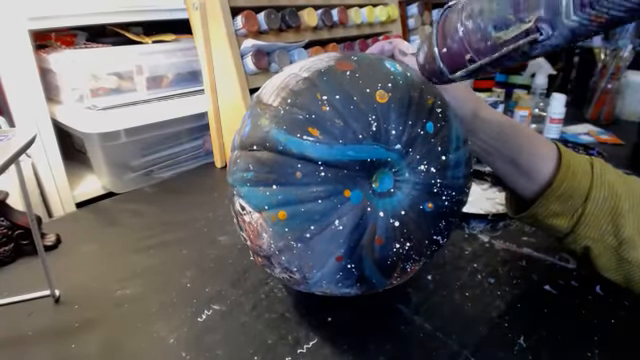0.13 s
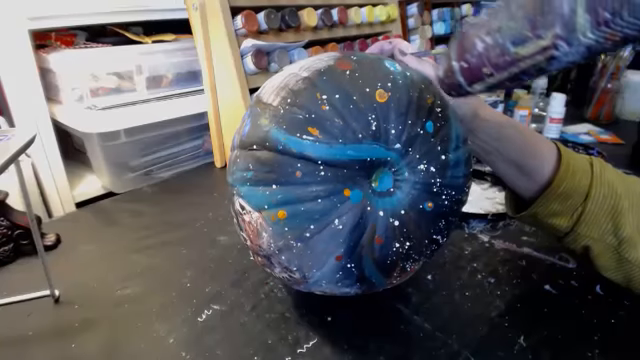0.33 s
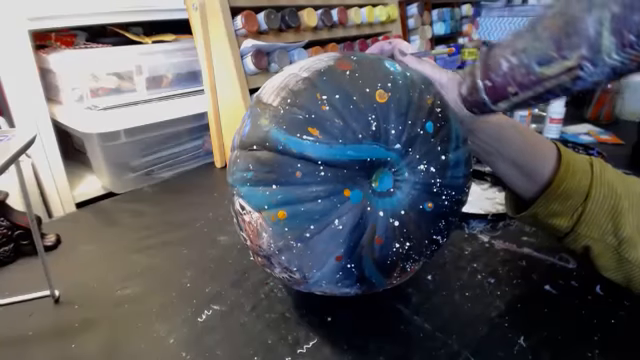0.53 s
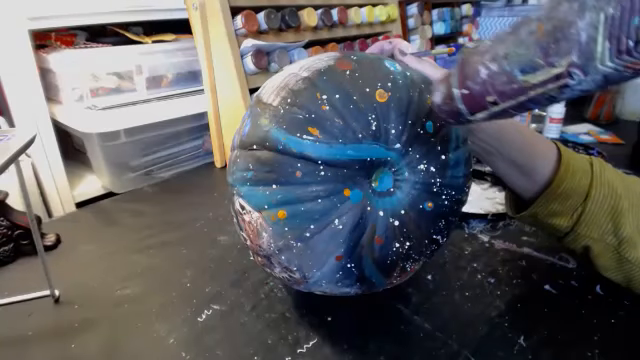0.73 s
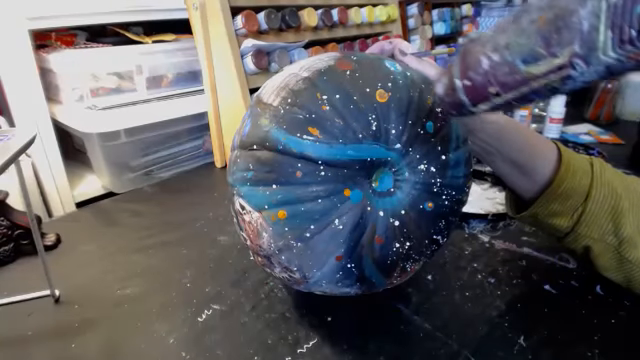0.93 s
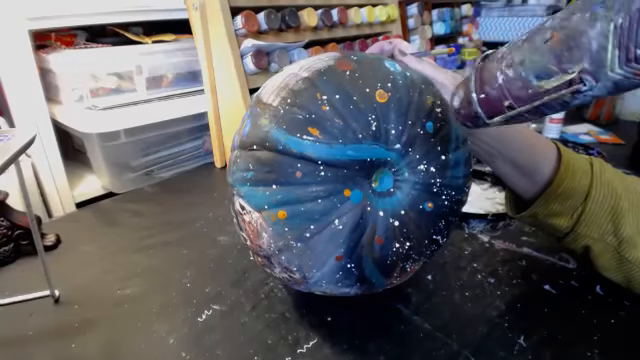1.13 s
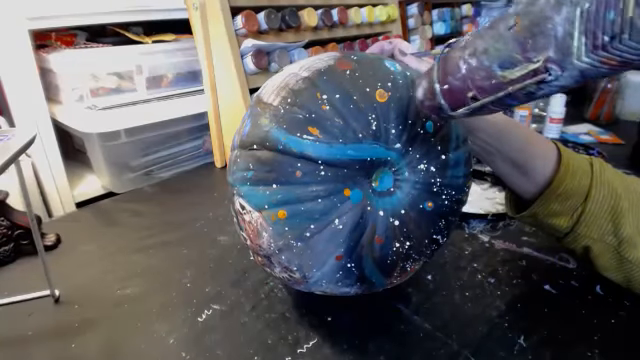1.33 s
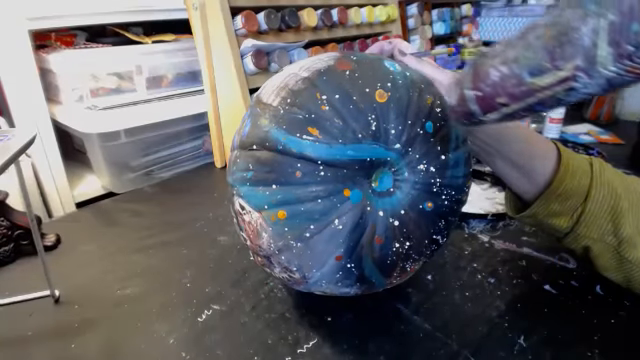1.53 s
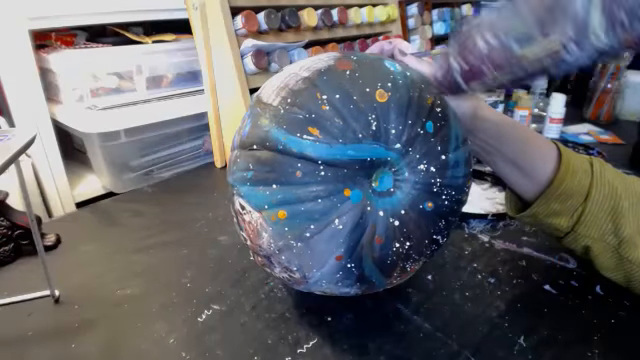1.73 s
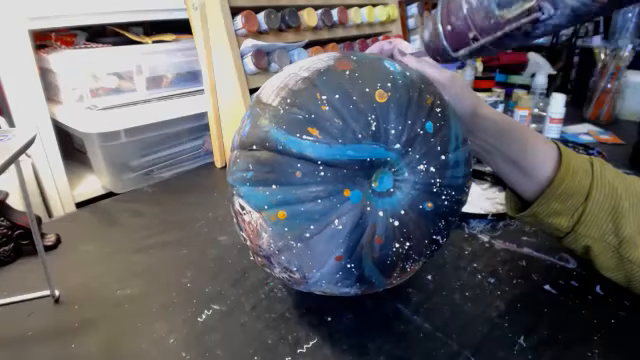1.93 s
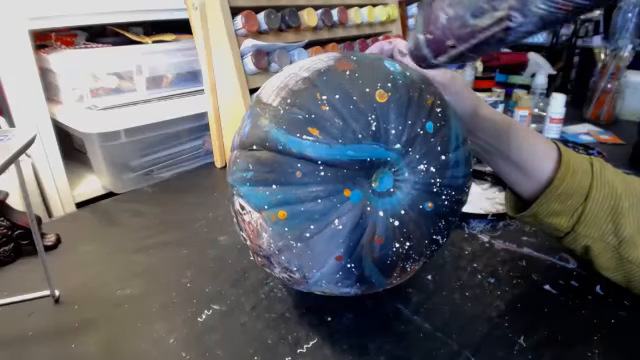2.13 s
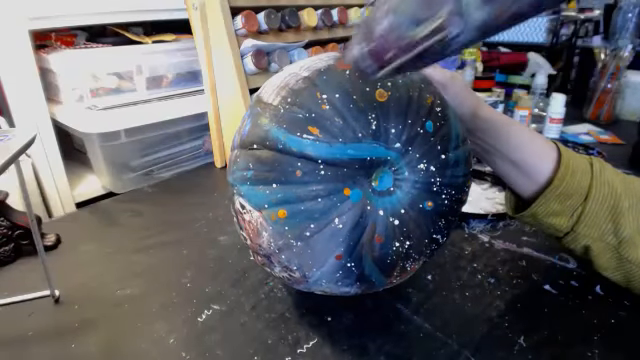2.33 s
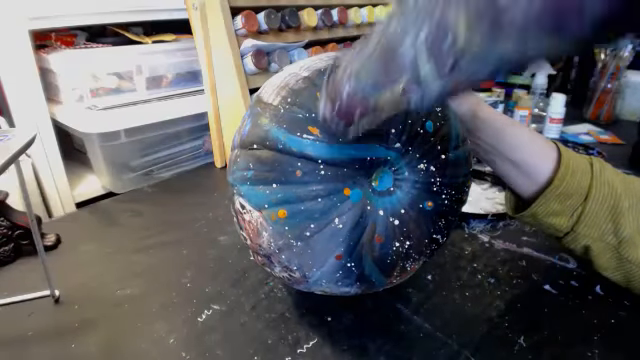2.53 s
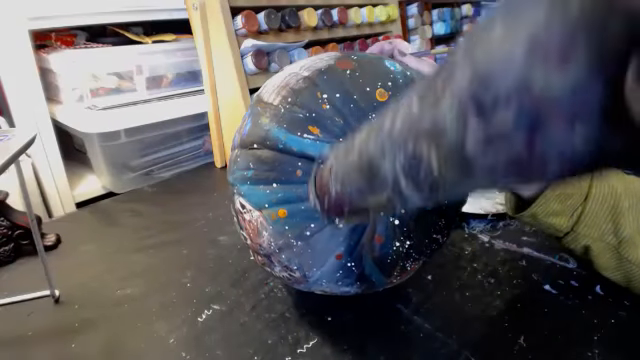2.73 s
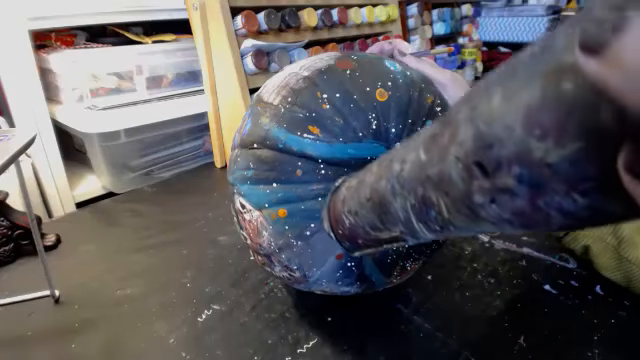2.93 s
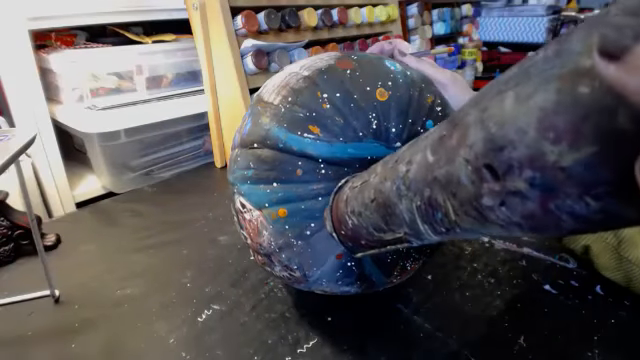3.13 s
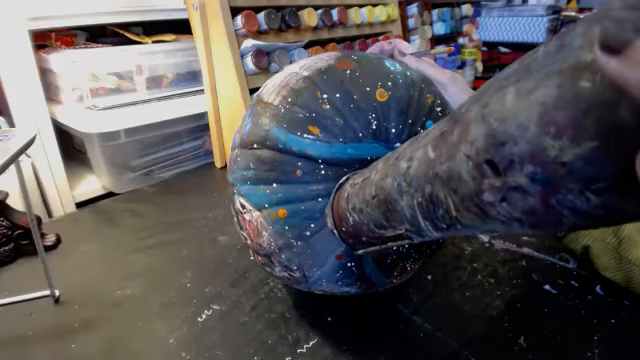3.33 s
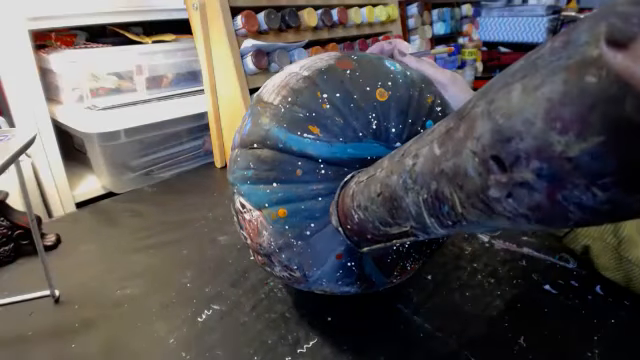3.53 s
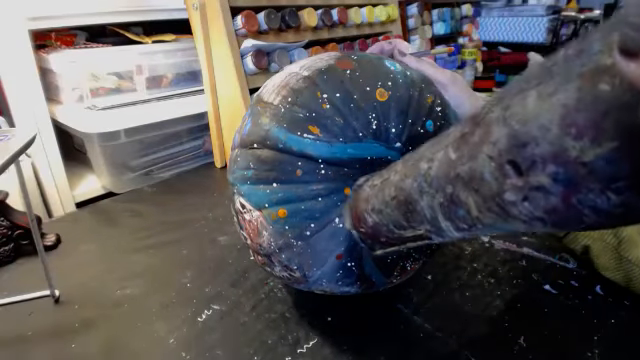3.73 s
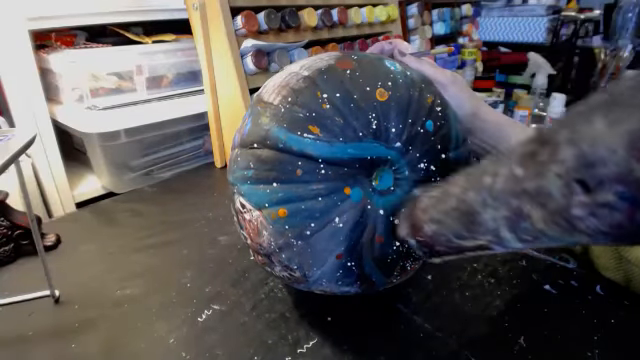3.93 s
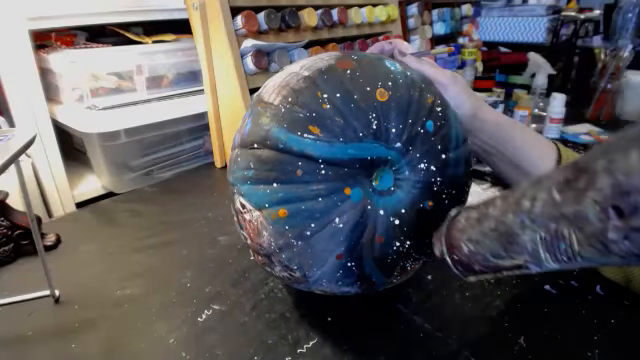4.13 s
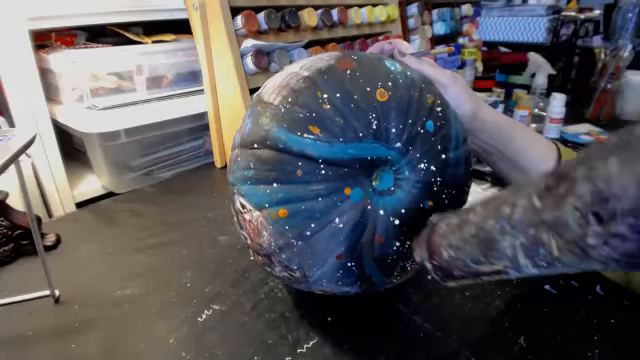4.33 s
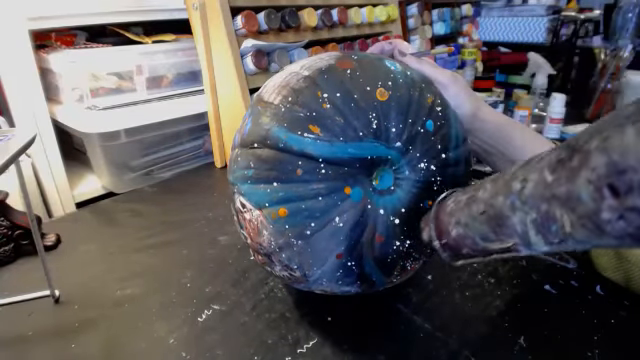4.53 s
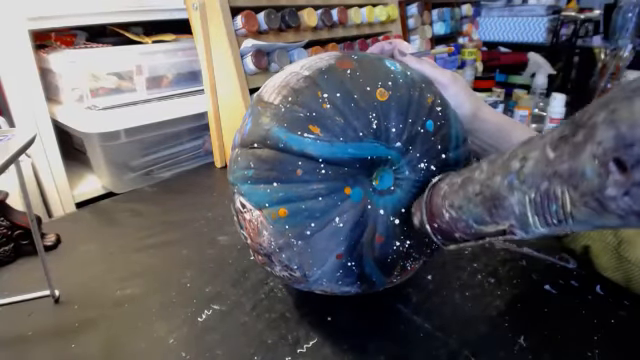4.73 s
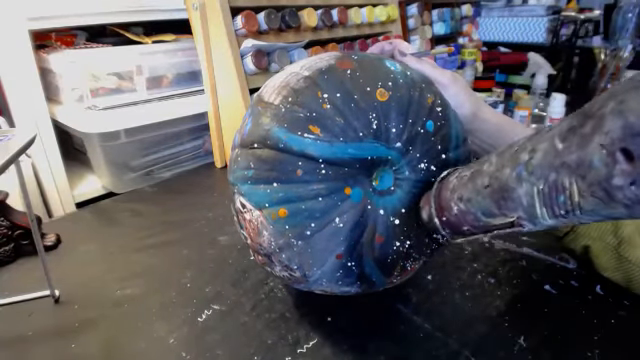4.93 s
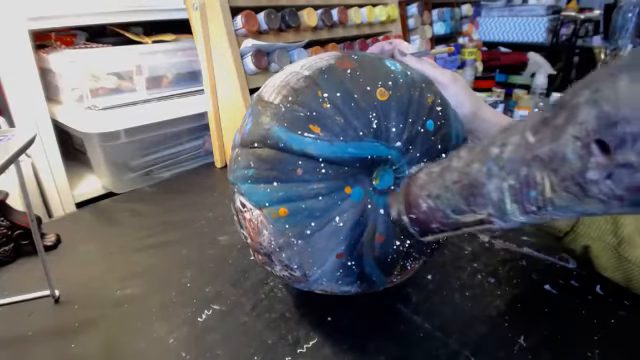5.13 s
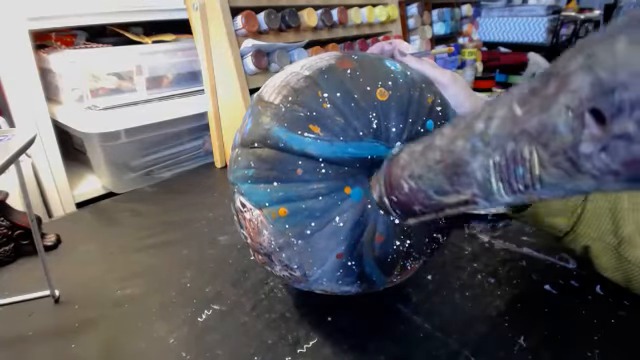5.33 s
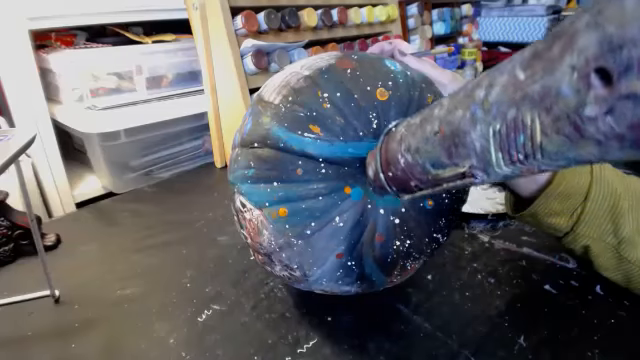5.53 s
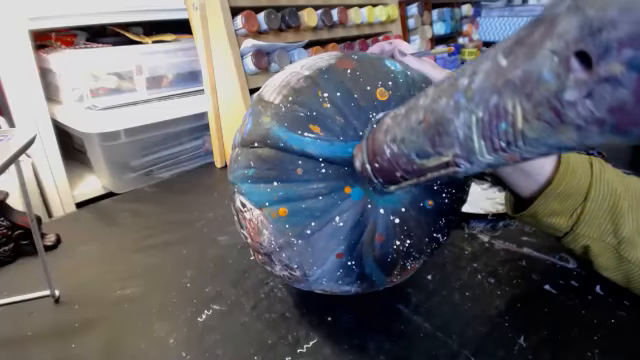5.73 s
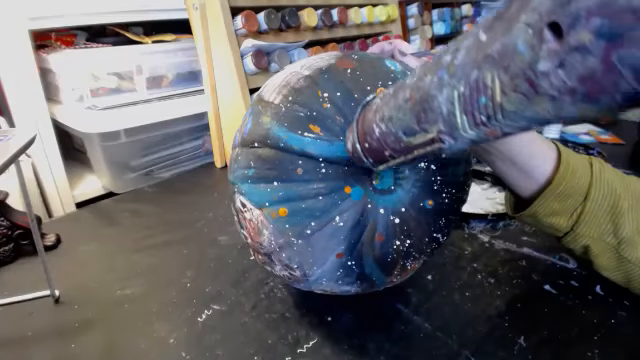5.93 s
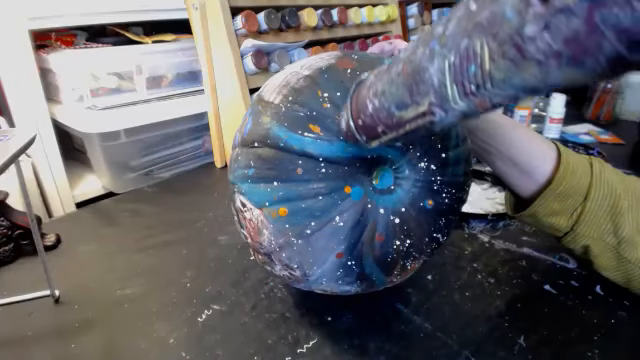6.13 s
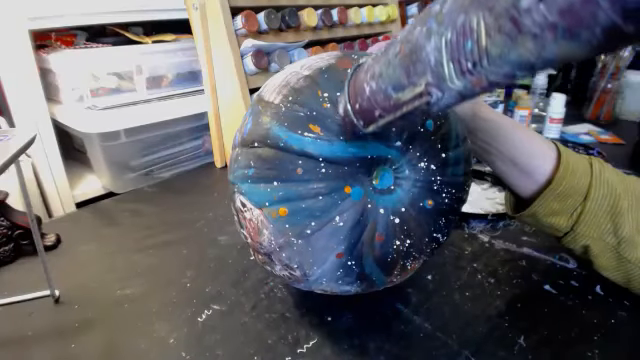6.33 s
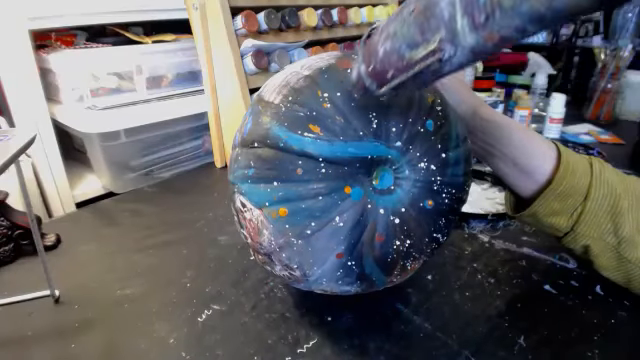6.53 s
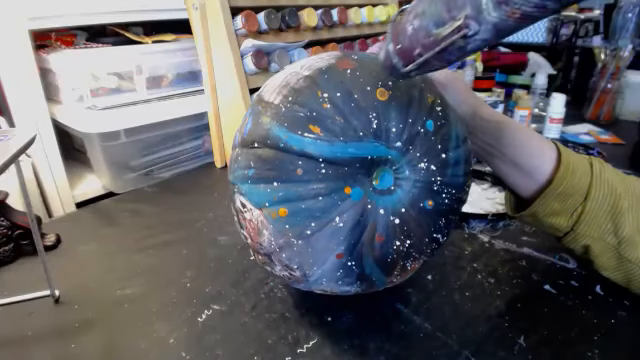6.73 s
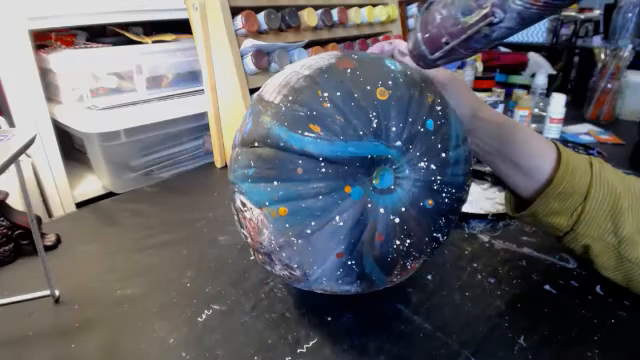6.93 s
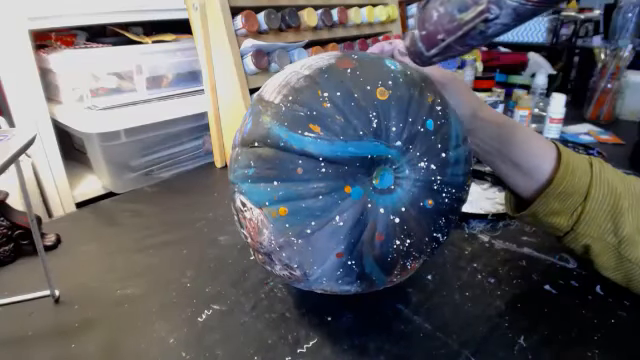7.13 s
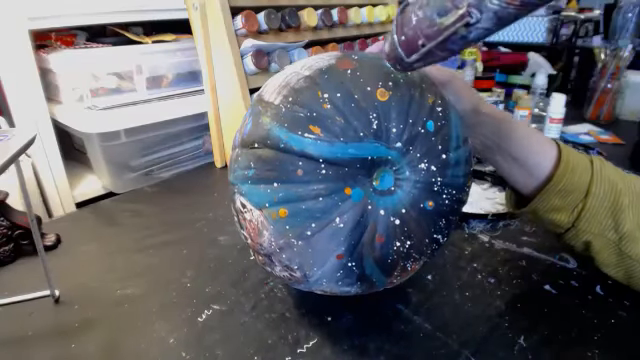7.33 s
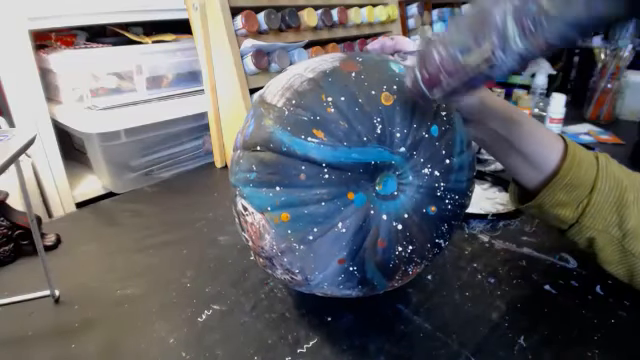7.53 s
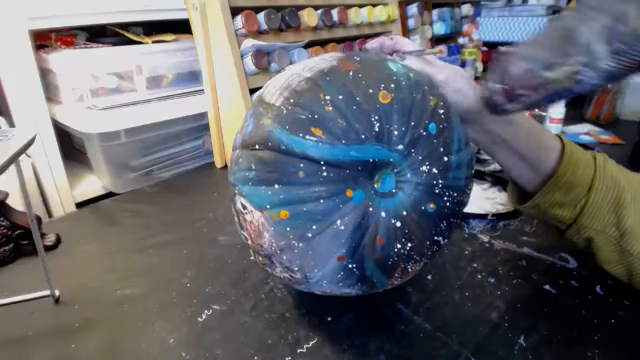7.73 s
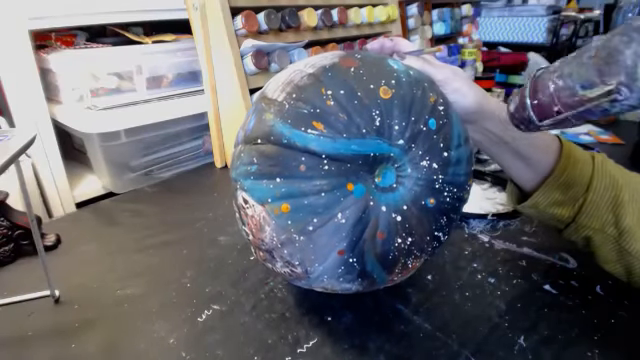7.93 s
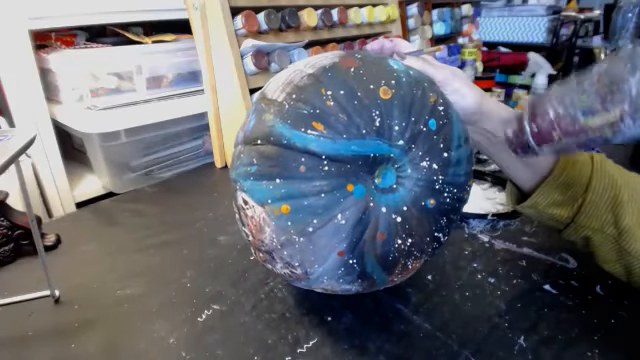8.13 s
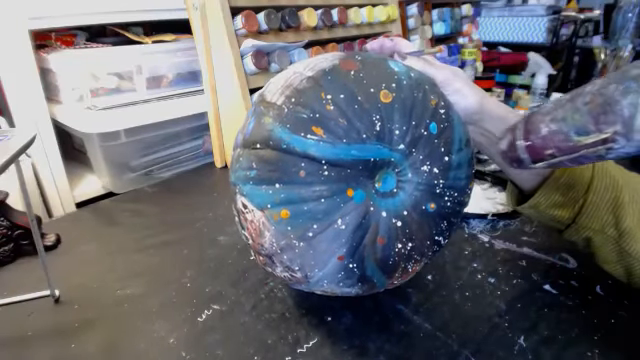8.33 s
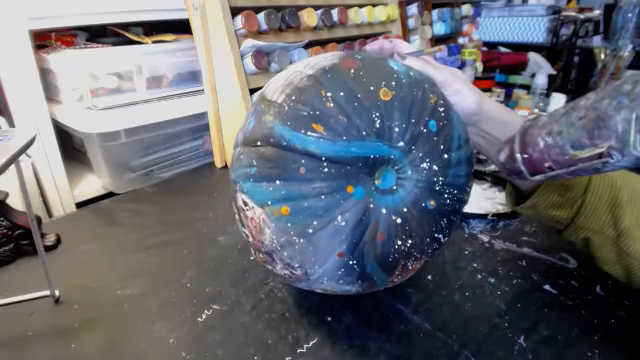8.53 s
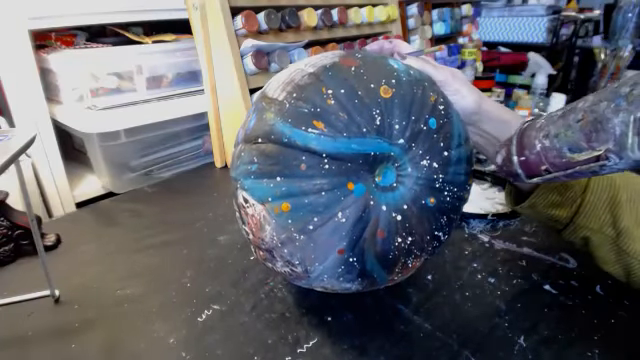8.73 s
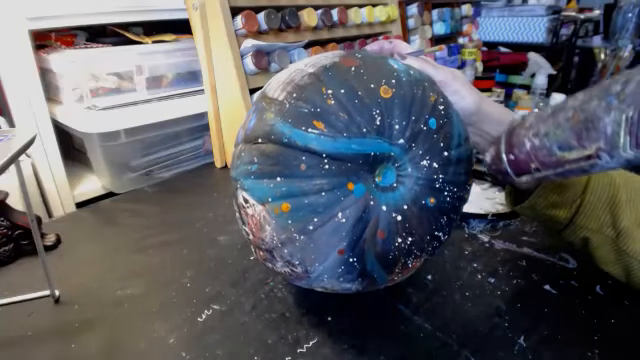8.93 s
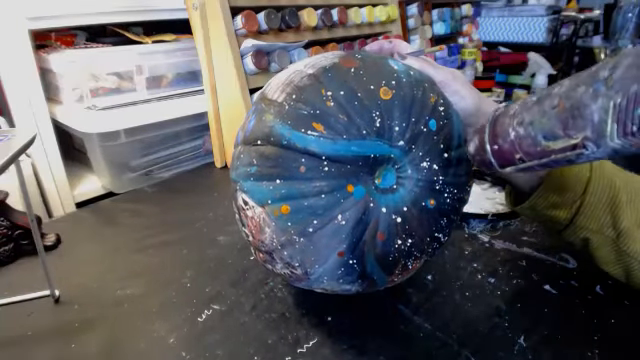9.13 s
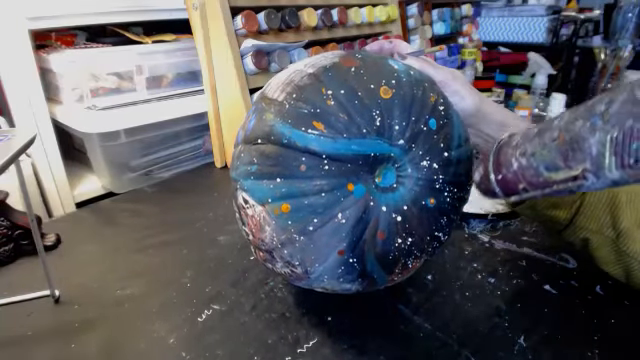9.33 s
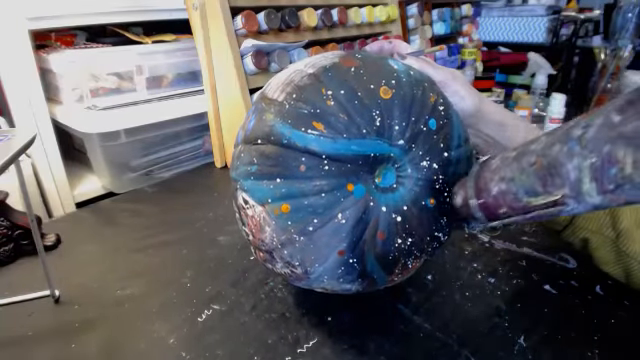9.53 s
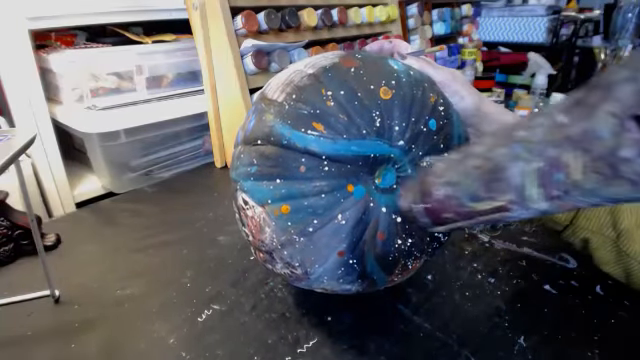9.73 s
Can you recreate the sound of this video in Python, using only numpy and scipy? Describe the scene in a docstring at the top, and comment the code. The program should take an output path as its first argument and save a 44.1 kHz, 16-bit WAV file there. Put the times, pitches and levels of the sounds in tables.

```python
"""A steady rush of air with a thin whine: a small heat gun, moved by hand around a painted gourd on a bench.
The air makes the gun's hollow housing ring, while the motor and its five-bladed fan whine at multiples
of the shaft speed. The tone shifts as the gun comes nearer, rises, turns and tilts.
Faint ticks dot the treble, and stray air adds a very quiet rumble."""
import sys
import numpy as np
from scipy import signal
from scipy.io import wavfile
from scipy.ndimage import uniform_filter1d

SR = 44100
rng = np.random.default_rng(int(sys.argv[2]) if len(sys.argv) > 2 else 0)


def master_out(mix):
    """Clip the mix to full scale and print it as 16-bit PCM to the path in sys.argv[1]."""
    frames = np.transpose(np.atleast_2d(mix))
    ceiling = np.clip(frames, -1, 1)
    pcm = np.round(ceiling * 32767).astype(np.int16)
    wavfile.write(sys.argv[1], SR, pcm)


N = 436149


def gain_of(db):
    """Turns decibels into a number to multiply a sound by."""
    return 10 ** (np.asarray(db) / 20)


def unit_level(x):
    """Scales a signal to an average (rms) level of 1."""
    return x / np.sqrt(np.mean(x ** 2) + 1e-20)


def add(mix, start_s, sound):
    """Mixes a sound in, beginning at start_s."""
    part = mix[round(start_s * SR):][:len(sound)]
    part += sound[:len(part)]


def bump(x, centre, width):
    """A smooth hill of height 1 that falls to 1/8 at one width from its centre."""
    return 1 / (1 + ((x - centre) / width) ** 2) ** 3


def waver(t, top_hz, count=1):
    """Rows of random wobble, each a sum of slow sine waves."""
    hz = np.geomspace(top_hz / 12, top_hz, 16)[:, None]
    phase = rng.random((count, 16, 1))
    return unit_level((np.sin(2 * np.pi * (hz * t + phase)) / hz ** 0.21).sum(1))


def draught(level_db=-67.5):
    """Stray air stirs the microphone: a faint, lumpy rumble."""
    t = np.arange(N) / SR
    gusts = gain_of(5 * np.interp(t, t[::400], waver(t[::400], top_hz=6.4)[0]))
    bass_filter = signal.butter(2, [18, 55], "band", fs=SR, output="sos")
    rumble = signal.sosfilt(bass_filter, rng.standard_normal(N))
    return gain_of(level_db) * unit_level(rumble * gusts)


# Faint ticks in the treble. Columns: start_s, level_db
TICKS = [(.134, -42), (1.0205, -24), (1.8566, -30), (2.321, -33), (5.3861, -31), (5.8041, -35),
         (6.6861, -32), (7.1042, -32), (7.5686, -33), (8.4511, -28), (8.8691, -33), (9.2867, -28)]


def ticks(length_s=0.0055):
    """Each tick is a sharp click, a tiny fizz that climbs in pitch, and a thin closing click."""
    out, t = np.zeros(N), np.arange(round(length_s * SR)) / SR
    closing_click = gain_of(-15) * np.array([-0.5, 1, -0.5])
    for start_s, level_db in TICKS:
        roughness = 1 + 2.5 * uniform_filter1d(rng.standard_normal(len(t)), size=6)
        rising_tone = np.sin(2 * np.pi * (7000 * t + 760000 * t ** 2))
        tick = gain_of(-25) * roughness * rising_tone * np.sin(np.pi * t / t[-1])
        tick[0] += 1  # the opening click
        add(tick, start_s=0.0045, sound=closing_click)
        add(out, start_s, gain_of(level_db) * tick)
    return out


# Brief swells of the housing's low note, loudest near time_s. Columns: time_s, level_db, length_s
SURGES = [(1.857, -26.5, .13), (5.479, -22.5, 0.036), (5.514, -21, 0.024), (5.528, -15.5, 0.014),
          (5.83, -17, .035), (6.715, -26, .035), (6.844, -25, .031), (7.156, -21.5, 0.032),
          (7.29, -20, .03), (7.563, -23, 0.032), (7.644, -20, 0.027), (7.889, -24.5, .05),
          (8.493, -31, 0.17), (8.8, -21, 0.025), (9.078, -24, 0.064), (9.127, -24, .022),
          (9.435, -25.5, 0.033), (9.473, -23, 0.039)]


def surges(pitch_hz=622.7):
    """The housing's low note builds up roughly and breaks off with a thump."""
    out = np.zeros(N)
    for time_s, level_db, length_s in SURGES:
        progress = np.linspace(0, 1, round(length_s * SR))
        cycles = pitch_hz * length_s * progress
        note, below, above = (np.sin(2 * np.pi * (ratio * cycles + rng.random()))
                              for ratio in (1, 0.8, 1.8))
        swell = np.sin(np.pi * progress ** 1.1) ** 2 * note
        thump = 0.17 * np.sin(np.pi * progress ** 4) ** 2 * (below + above)
        add(out, time_s - 0.6 * length_s, gain_of(level_db) * (swell + thump))
    return out


# How the hand holds the gun. Columns: time_s, then nearness, height, turn, tilt (each -1 to 1)
HAND_POSES = [(0.0, -0.16, 0.52, -0.66, -0.24), (0.45, -0.27, 0.16, -0.35, -0.2),
              (0.9, -0.2, 0.79, -0.67, -0.2), (1.6, -0.3, 0.33, -0.59, -0.24),
              (2.2, -0.2, 0.74, -0.12, -0.33), (2.6, 0.43, 0.83, 0.98, -0.05),
              (2.8, 0.83, 0.15, 0.32, 0.05), (3.0, 0.91, 0.08, 0.024, 0.56),
              (3.75, 0.76, 0.035, -0.16, 0.28), (4.2, 0.27, -0.8, -0.23, 0.42),
              (5.0, 0.36, -0.56, -0.28, 0.1), (5.3, 0.59, 0.013, 0.15, -0.3), (6.0, 0.48, 0.33, 0.7, -0.04),
              (6.75, -0.68, 0.62, 0.33, 0.7), (7.55, -0.54, 0.17, 0.58, 0.73),
              (7.95, -0.62, -0.55, 0.072, -0.5), (8.6, -0.37, -0.96, 0.4, -0.12),
              (9.25, -0.3, -0.72, 0.66, -0), (9.6, 0.19, -0.62, -0.19, -0.1),
              (9.89, 0.62, 0.15, -0.16, -0.6)]


def hand_pose(t):
    """The gun glides between poses. Rows: ones (for the base level), nearness, height, turn, tilt."""
    time_s, *columns = np.transpose(HAND_POSES)
    return np.array([np.ones_like(t), *(np.interp(t, time_s, column) for column in columns)])


# The motor speeds up a little as it warms. Columns: time_s, speed_hz
SHAFT_SPEED = [(0, 307.1), (2.2, 307.3), (2.8, 307.85), (4.6, 308.3), (6.6, 310.6), (7.4, 311),
               (8.1, 310.55), (9.9, 311)]


def shaft_turns(wobble_hz=0.12):
    """Counts the turns the motor has made so far; its speed wanders slightly."""
    t = np.arange(N) / SR
    wobble = np.interp(t, t[::400], waver(t[::400], top_hz=15)[0])
    speed_hz = np.interp(t, *np.transpose(SHAFT_SPEED)) + wobble_hz * wobble
    return np.cumsum(speed_hz) / SR


# The motor's tones; the last four columns say how much the pose adds to the level.
# Columns: shaft_multiple, level_db, nearness_db, height_db, turn_db, tilt_db
MOTOR_TONES = [(1, -45.5, 2.5, 1.5, 3, -1), (2, -40, 1.7, 2.5, -1, 1), (3, -44.5, 6.5, 0, 6, 3),
               (4, -51.5, 5, 5, -4.5, 2), (6, -46.5, 2, -0.0, 1.5, 5.5), (7, -52.5, 7.5, -5, 4, 6),
               (8, -53.5, 5, 6, 1, -2), (9, -59.5, 16, 2, -10, -2), (10, -60, -1, 2.5, 3.5, -1),
               (12, -63.5, 6, -8, 5, -3), (13, -66.5, 6, 4, 0, -3), (14, -70.2, 9.7, 5, -3, -12),
               (15, -72, -1, -9, 4, 4.0), (16, -59, 4.5, -1, -1, 1), (17, -66, -1, 3.6, -4, -0.1),
               (18, -75, 2.0, 7, 4, -2.1), (19, -67.5, 7, -4, 6.0, 3), (20, -76, 8.8, 12, 5, -7),
               (27, -78, 19, 3.7, -0.5, 1.8)]
# The tone of the fan blades. Columns: time_s, level_db
FAN_LEVEL = [(0, -40), (2.2, -38.5), (2.9, -31.5), (3.4, -30), (4.2, -31.5), (6.0, -29.5), (6.6, -38.5),
             (7.42, -38.5), (7.6, -33), (9.89, -29.5)]


def motor_and_fan(turns, blades=5):
    """The spinning motor whines in wavering tones; the fan's tone stands out and is steadier."""
    t = np.arange(N) / SR
    coarse_t = np.arange(N // 200 + 2) * 200 / SR
    tones = np.array(MOTOR_TONES)
    multiples = np.append(np.round(tones[:, 0]), blades)
    motor_db = tones[:, 1:] @ hand_pose(coarse_t)
    fan_db = np.interp(coarse_t, *np.transpose(FAN_LEVEL))
    depth_db = np.append(np.where(multiples[:-1] > 1, 2.1, 1.3), 0.6)[:, None]
    waver_db = depth_db * waver(coarse_t, top_hz=24, count=len(multiples))
    levels = gain_of(np.vstack([motor_db, fan_db]) + waver_db)
    out = np.zeros(N)
    for multiple, level in zip(multiples, levels):
        tone = np.sqrt(2) * np.sin(2 * np.pi * (multiple * turns + rng.random()))
        out += np.interp(t, coarse_t, level) * tone
    return out


# Three dips in the air noise. Columns: time_s, low_hz, low_cut_db, middle_hz, middle_cut_db, top_cut_db
ECHO_DIPS = [(0, 1930, 5, 2590, 2, 1), (2.3, 1940, 2, 2590, 1, 1), (2.6, 1810, 18, 2610, 6, -1),
             (3.6, 1860, 12, 2540, 3, -1), (4.15, 2050, 4, 2640, 6, 2), (5.1, 2020, 7, 2560, 2, 0),
             (6.3, 1950, -1, 2930, 1, -1), (7.1, 2040, 4, 3000, 4, 6), (7.8, 2110, 6, 2950, 12, -1),
             (9.89, 2030, 9, 2640, -1, 1)]


def echo_cut_db(hz, t, top_hz=4080):
    """Echoes from the bench and the gourd partly cancel the air noise around three pitches."""
    time_s, *columns = np.transpose(ECHO_DIPS)
    low_hz, low_db, middle_hz, middle_db, top_db = (np.interp(t, time_s, column) for column in columns)
    return (low_db * bump(hz[:, None], low_hz, width=115)
            + middle_db * bump(hz[:, None], middle_hz, width=160)
            + top_db * bump(hz[:, None], top_hz, width=500))


# Passes of the air jet. Columns: peak_s, width_s, pitch_hz, width_hz, relative_db
JET_SWEEPS = [(2.552, .15, 6200, 900, -21), (2.72, .12, 10800, 1800, -28), (2.818, 0.087, 7140, 2200, -22),
              (3.5, .08, 7500, 1500, -25), (9.78, .12, 5570, 1200, -19)]


def jet_power(hz, t):
    """The edge of the jet sweeps past the microphone with a short, high hiss."""
    return sum(gain_of(db) ** 2 * np.outer(bump(hz, pitch_hz, width_hz), bump(t, peak_s, width_s))
               for peak_s, width_s, pitch_hz, width_hz, db in JET_SWEEPS)


# The broad rush of air. Columns: pitch_hz, relative_db, nearness_db, height_db, turn_db, tilt_db
AIR_RUSH = [(29.8, -30, 5, -0.4, 0.1, -1.2), (81.5, -31, 3, 0.5, 1, 1.5), (254, -18.5, 4, 1, 1.1, -1),
            (435, -18, 3.5, -1.3, 1.7, -0.5), (1165, -18, -5.5, -5, 1.5, 4.5), (1970, -18, 7, 2, -2, -6),
            (2450, -27, 2, -8.5, 5, -10), (2910, -21, 2.5, 2, -1.5, -0.5), (3750, -30, 0.5, -1, -3, -1),
            (8100, -38.5, 1, 1, 3, -2), (11300, -51.5, 10, -0.3, -4, -6), (13400, -53, 4.2, -3, 1.8, -3),
            (15200, -58, 5.7, -0.8, 1.8, -1.4)]


def rush_power(hz, t):
    """Swirling air makes noise from bass to treble, and the pose shifts the balance."""
    pitch_hz, *columns = np.transpose(AIR_RUSH)
    curves_db = np.array([np.interp(np.log(hz + 1), np.log(pitch_hz), column) for column in columns])
    return gain_of(curves_db.T @ hand_pose(t)) ** 2


# The notes at which the air in the barrel and housing rings.
# Columns: pitch_hz, width_hz, relative_db, nearness_db, height_db, turn_db, tilt_db
HOUSING_NOTES = [(633, 67, 1, 2, 3.5, 1, 0.4), (556, 31, -6.5, 5.5, 5, -2, 3),
                 (743, 150, -9.5, 7.5, 6.5, 1, 2.5), (917, 192, -4.5, 2.5, 1.5, -1, 1),
                 (1341, 125, -8.5, 4, 3, 2.5, 2.5), (1643, 270, -12, 9, 2.5, 3, 3.5),
                 (1775, 160, -8, -1, -5, -3.5, 5.5), (2160, 280, -11.5, 2.5, 2, -1, -2.5),
                 (2668, 128, -15.5, 6.5, 7, 1.5, -1), (3105, 260, -19, 3.5, -2.5, -3.5, 0),
                 (3380, 237, -18.5, 3, 0, 1.2, 3.5), (4020, 320, -28.5, 10, -3, -3, 5),
                 (4490, 310, -22.5, 8, -3, -0.5, 4), (4883, 226, -19, 7.5, -2.5, -4.5, 3.5),
                 (5320, 210, -24.5, 8, -4.5, -4, 3), (5720, 390, -25, 5.5, 0, -0.5, 3.5),
                 (6430, 770, -27.5, 3.5, 0.5, 0.5, 1.5), (7230, 650, -35, 8, 4, -2, 9),
                 (8910, 990, -33.5, 8, 1, -2.5, -1), (10000, 1180, -35, 11, -3.5, 5.5, -2),
                 (11900, 1600, -47, 4.5, 1, 1, 3)]


def housing_power(hz, t):
    """The airflow drives each note of the housing unevenly, so each one flutters."""
    pose = hand_pose(t)
    flutter_db = 0.83 * waver(t, top_hz=32, count=len(HOUSING_NOTES))
    flutter_db[0] *= 1.6  # the strong low note comes in puffs
    return sum(np.outer(bump(hz, pitch_hz, width_hz), gain_of(pose_db @ pose + flutter) ** 2)
               for (pitch_hz, width_hz, *pose_db), flutter in zip(HOUSING_NOTES, flutter_db))


def blowing_air(turns, level_db=-29.5, treble_hz=3500):
    """Swirling air heard through the housing and the room; its treble throbs once per shaft turn."""
    # the noise is shaped on a grid: one row per pitch, one column per moment
    hz = np.fft.rfftfreq(2048, 1 / SR)
    t = np.arange(N // 512 + 5) * 512 / SR
    real, imaginary, ripple = rng.standard_normal((len(t), len(hz), 3)).T
    # room echoes leave a fine, drifting pattern of louder and softer pitches
    ripple = uniform_filter1d(ripple, size=40, axis=1)
    ripple = unit_level(uniform_filter1d(ripple, size=3, axis=0))
    highness = np.clip(hz / 14300, 0, 1.6)[:, None]
    ripple_db = (1.07 + 0.81 * np.minimum(highness, 1)) * ripple
    flicker_db = 0.32 * highness * waver(t, top_hz=35)
    power = rush_power(hz, t) + housing_power(hz, t) + jet_power(hz, t)
    grid = (real + 1j * imaginary) * np.sqrt(power) * gain_of(ripple_db + flicker_db - echo_cut_db(hz, t))
    is_treble = hz[:, None] >= treble_hz
    body, treble = (signal.istft(grid * band, nperseg=2048, noverlap=1536)[1][:N]
                    for band in (~is_treble, is_treble))
    throb = 1 + 0.05 * np.cos(2 * np.pi * turns)
    return gain_of(level_db) * unit_level(body + treble * throb)


def scene():
    """Mixes the gun's air, motor and surges with the draught and the ticks, in one channel."""
    turns = shaft_turns()
    return (blowing_air(turns) + motor_and_fan(turns) + surges() + draught() + ticks())[None]


def record(dry):
    """Cuts away the very highest treble."""
    cutoff_hz = 15715
    low_pass = signal.firwin(2047, cutoff_hz, window=("kaiser", 9), fs=SR)
    return signal.oaconvolve(dry, low_pass[None], "same")


dry = scene()
out = record(dry)
master_out(out)
```